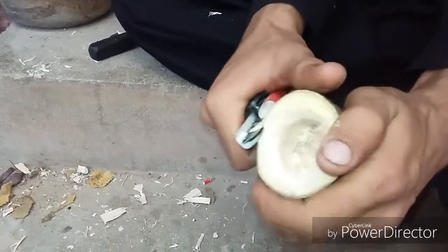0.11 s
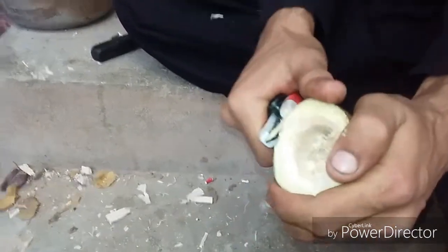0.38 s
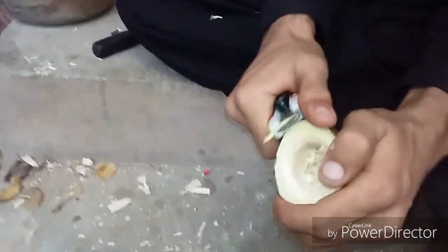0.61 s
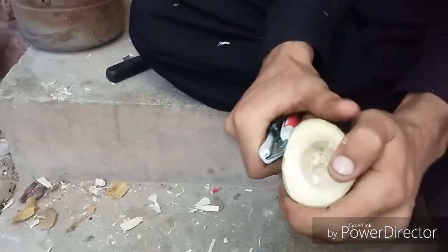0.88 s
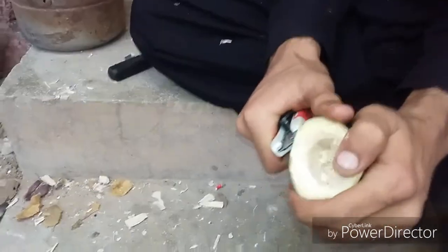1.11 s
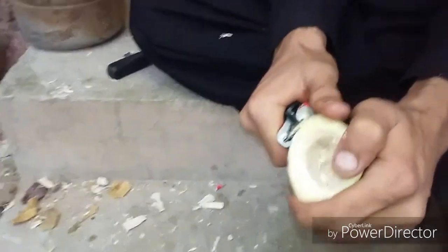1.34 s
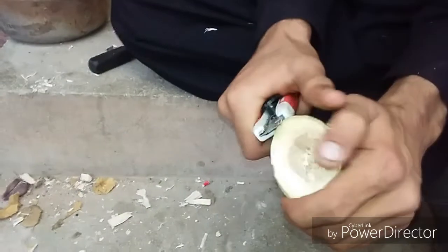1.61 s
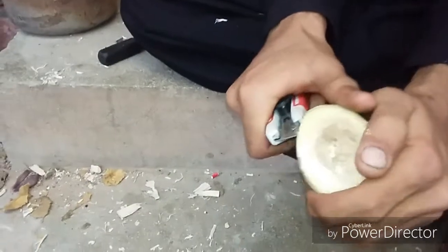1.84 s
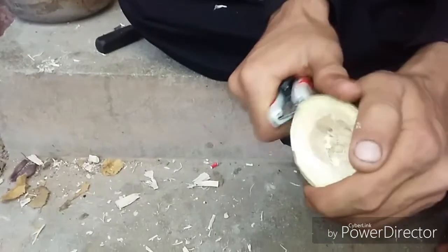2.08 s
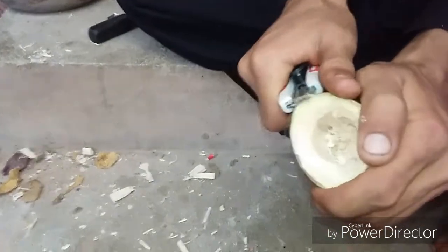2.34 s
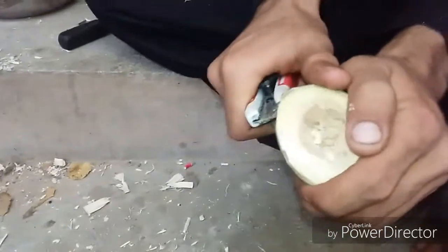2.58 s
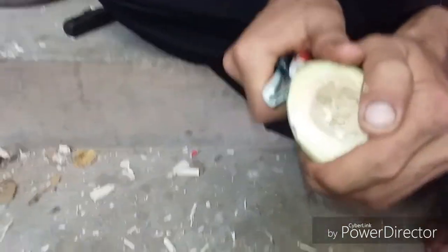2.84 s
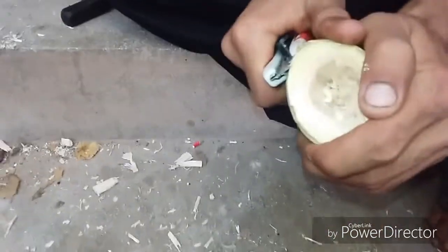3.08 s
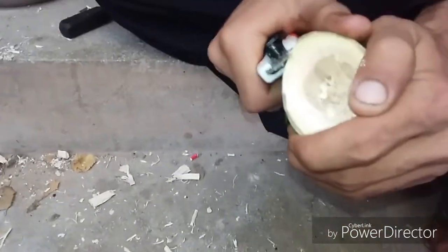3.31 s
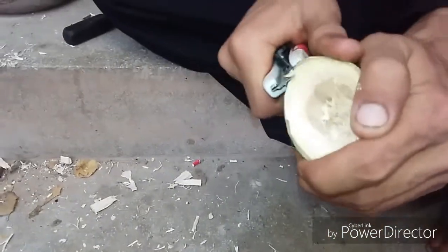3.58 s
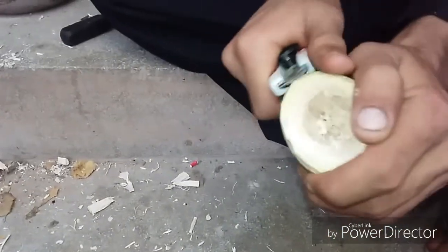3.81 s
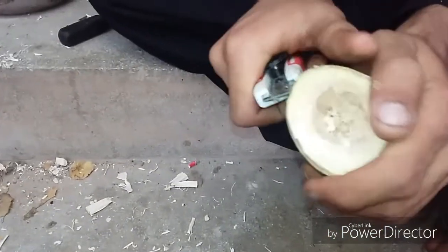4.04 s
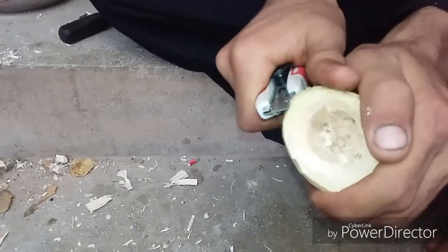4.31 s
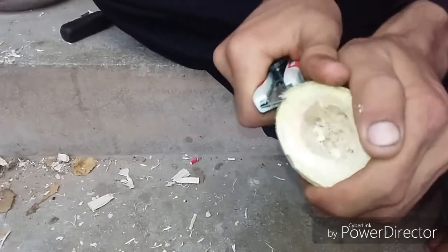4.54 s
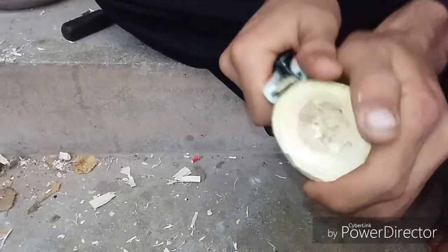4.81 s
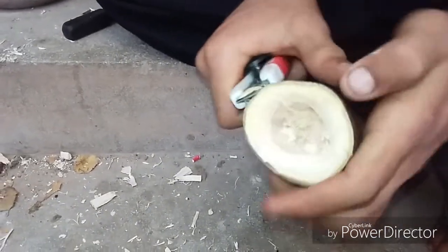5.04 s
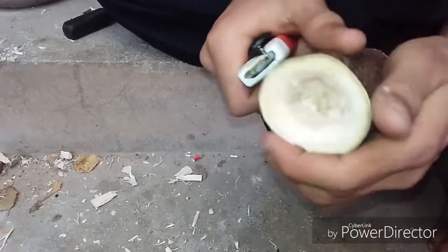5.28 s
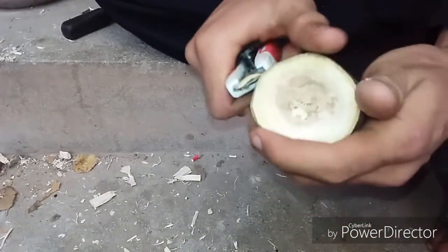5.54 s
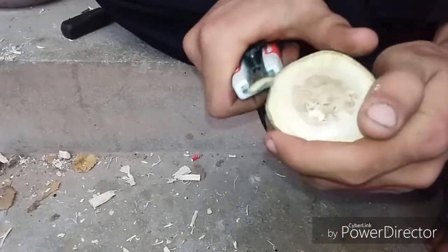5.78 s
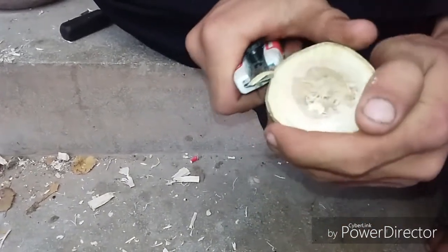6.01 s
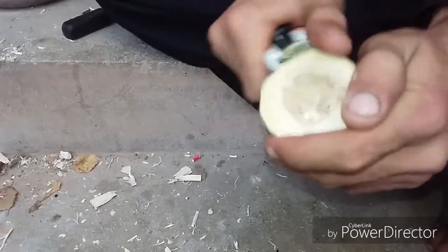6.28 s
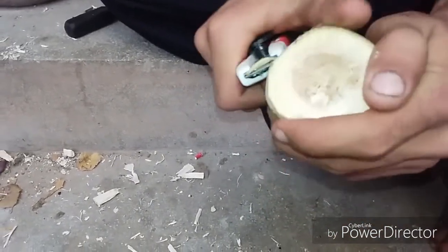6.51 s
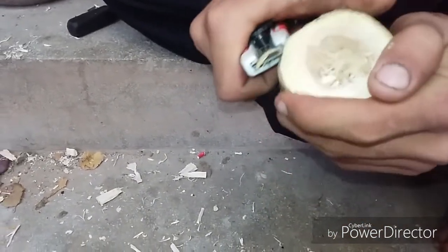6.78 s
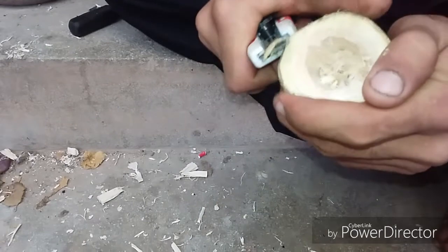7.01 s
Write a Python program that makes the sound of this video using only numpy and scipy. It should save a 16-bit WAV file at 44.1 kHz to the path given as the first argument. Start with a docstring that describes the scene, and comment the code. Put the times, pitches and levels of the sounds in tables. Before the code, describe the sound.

A small knife pares a hand-held wooden round, close and dry, outdoors. Quiet rumble, rustle, slight hiss and a faint high insect trill run throughout. From 0.3 s a rub and dull knock lead into crackling scrapes, strongest at 0.65. After a pause with faint low hums near 1 s, another gritty cluster at 1.4-1.6 ends in a low thump. Light, quick ticks run 2.2-2.6. A sharp snap comes at 3.03, then thin far bird whistles around 3.3-3.6. Strong scrapes and knocks hit at 3.7-3.8. One crisp snap at 4.53 precedes the loudest crack at 4.78, with distant whistle and hoarse calls around it. Small ticks at 5.3 lead to a calm stretch with faint bird calls until 6.2. A dense run of woody scrapes follows at 6.25-6.42, then a soft two-surge swish at 6.7-6.8 fades into the quiet background by 7.1.

```python
"""Paring wood outdoors

A small knife pares the rim of a hand-held round of wood, close to a phone's microphone.
The blade sticks and slips in short bursts: swarms of tiny clicks ring the modes of the wood.
Dull knocks are damped low pushes with a tick; rubs and a late swish are grainy friction.
Further off, noise bands make trilling insects and low traffic rumble, with a rustle over them;
gliding tones make a far bird's whistles, hoarse calls and faint hums."""
import sys
import numpy as np
from scipy import signal
from scipy.fft import rfft, irfft
from scipy.io import wavfile
from scipy.ndimage import uniform_filter1d

SR = 44100
rng = np.random.default_rng(int(sys.argv[2]) if len(sys.argv) > 2 else 0)


def how_loud(loudness_db):
    """Turn decibels into a plain amplitude multiplier (0 dB gives 1, 20 dB gives 10)."""
    steps = np.asarray(loudness_db, float) / 20
    return 10 ** steps


def dump(signal):
    """Clip the signal to [-1, 1] and save it as 16-bit WAV at the path in sys.argv[1]."""
    limited = np.clip(np.atleast_2d(signal).T, -1, 1)
    pcm = np.round(limited * 32767).astype(np.int16)
    wavfile.write(sys.argv[1], SR, pcm)


N = 314433
T = np.arange(N) / SR


def evened(x):
    """Scales to rms 1."""
    return x / np.sqrt(np.mean(x ** 2) + 1e-20)


def add(mix, s, sound):
    """Mixes a sound in from second s."""
    part = mix[round(s * SR):][:len(sound)]
    part += sound[:len(part)]


def track(sounds):
    """Lays (start in s, sound) pairs on a silent track."""
    out = np.zeros(N)
    for s, sound in sounds:
        add(out, s, sound)
    return out


def resonate(x, hz, width):
    """Shifts the curve hz down to zero, smooths, and shifts back: a resonance of gain 1."""
    turn = np.exp(2j * np.pi * np.cumsum(hz * np.ones(len(x))) / SR)
    r = np.exp(-np.pi * width / SR)
    return 2 * (turn * signal.lfilter([1 - r], [1, -r], x / turn)).real


def colour(x, points):
    """Filters by a spectrum, keeping the power of white input."""
    f, db = np.transpose(points)
    bins = np.fft.rfftfreq(len(x), 1 / SR)
    gain = how_loud(np.interp(np.log(bins + 1), np.log(f), db))
    return irfft(rfft(x) * evened(gain), len(x))


def crackle(count, per_s, spread_db):
    """Dense clicks of random sign and uneven size, scaled to rms 1."""
    hit = rng.random(count) < per_s / SR
    size = rng.exponential(size=count)
    sign = rng.standard_normal(count)
    return evened(hit * how_loud(spread_db * np.minimum(size, 4)) * sign)


def drift(per_s):
    """Slow random wander of rms 1."""
    return evened(resonate(resonate(rng.standard_normal(N), 0, per_s), 0, per_s))


def patches(x, patchy_db):
    """Lets the level wander in small blotches of pitch and time."""
    z = signal.stft(x, nperseg=512)[2]
    field = rng.standard_normal(z.shape[::-1]).T
    field = uniform_filter1d(field, size=6, axis=0)
    field = uniform_filter1d(field, size=7, axis=1)
    return evened(signal.istft(z * how_loud(patchy_db * evened(field)), nperseg=512)[1][:N])


# rustle of hands and cloth: (t/s, level/dB)
RUSTLE_LEVEL = [(0.0, -66), (0.55, -61.5), (0.97, -67), (2.24, -68), (2.44, -64.5), (3.16, -63.5),
                (3.61, -70), (3.77, -56), (3.89, -63.5), (4.05, -67.5), (4.57, -64.5), (4.75, -69),
                (4.94, -68), (5.26, -65.5), (6.05, -69), (6.25, -66.5), (6.45, -67.5), (7.13, -63.5)]
# spectrum of the low rumble: (f/Hz, relative density/dB)
RUMBLE_SPECTRUM = [(18, -38), (30, -14.5), (65, 0.5), (199, -5), (279, -15), (397, -16), (487, -20),
                   (635, -21), (1000, -29.5), (1300, -35.5), (2200, -120)]
# spectrum of the rustle: (f/Hz, relative density/dB)
RUSTLE_SPECTRUM = [(300, -3.5), (800, -1), (1500, -2), (3400, -3.5), (4700, -12.5), (5600, -15),
                   (8100, -28.5), (15700, -19)]
RUMBLE_DB, RUMBLE_SHARE, CALM_DB = -58, 0.53, -66.5  # rumble at calm, dB per dB of rustle, calm rustle


def air():
    """Lumpy low rumble that swells with a wide, faintly grainy rustle."""
    rustle_db = np.interp(T, *np.transpose(RUSTLE_LEVEL))
    rumble_db = RUMBLE_DB + RUMBLE_SHARE * (rustle_db - CALM_DB)
    rumble = colour(rng.standard_normal(N), RUMBLE_SPECTRUM)
    grains = crackle(N, per_s=15000, spread_db=0.5)
    rustle = patches(colour(grains, RUSTLE_SPECTRUM), patchy_db=2.5)
    return rumble * how_loud(rumble_db + 1.11 * drift(36)) + rustle * how_loud(rustle_db + 0.93 * drift(25))


# insect band as heard at the microphone, with sudden level changes:
# (t/s, chorus level/dB, nearest singer level/dB)
INSECT_LEVELS = [(0, -77, -79), (.3, -70, -81.5), (3.86, -71.5, -77), (3.9, -77, -87), (4.26, -79, -78),
                 (4.3, -70.5, -79), (4.8, -69.5, -73), (4.95, -60, -68), (5, -73, -74.5), (6, -72.5, -75.5),
                 (7.13, -72.5, -76)]
# spectrum of the chorus: (f/Hz, relative density/dB)
CHORUS_SPECTRUM = [(5300, -56), (5750, -11), (6200, -5), (6850, 3), (7250, -7), (7550, -12), (7800, -27.5)]
CHIRPS_PER_S, CHIRP_LAG_S = 12, 0.0301


def insects():
    """A blurred noise-band chorus, and one nearer singer that gives two short pulses a chirp."""
    s, *columns = np.transpose(INSECT_LEVELS)
    chorus_db, near_db = (np.interp(T, s, c) for c in columns)
    within = ((T - CHIRP_LAG_S) * CHIRPS_PER_S + .5) % 1 - .5  # share of a chirp period from its middle
    pulses = np.exp(-((abs(within) / CHIRPS_PER_S - .0125) / 0.0055) ** 2)  # s either side of the middle
    chorus = colour(rng.standard_normal(N), CHORUS_SPECTRUM)
    near = pulses * resonate(resonate(rng.standard_normal(N), 7304, 530), 6180, 600)
    return how_loud(chorus_db + 2.37 * drift(43)) * evened(chorus) + how_loud(near_db) * evened(near)


def tone(rows, rasp):
    """A thin tone from afar whose level flutters; rasp (0 to 1) spreads it into a rough band."""
    flutter_db = 1.2
    s, *columns = np.transpose(rows)
    t = np.arange(s[0], s[-1], 1 / SR)
    hz, db = (np.interp(t, s, c) for c in columns)
    narrow, wide = rng.standard_normal((2, len(t)))
    thin = np.sin(2 * np.pi * np.cumsum(hz) / SR)
    thin += 0.3 * evened(resonate(resonate(narrow, hz, 70), hz, 70))
    rough = resonate(resonate(wide, hz, 420), hz, 500)
    mix = np.sqrt(1 - rasp) * evened(thin) + np.sqrt(rasp) * evened(rough)
    level = how_loud(db + flutter_db * drift(29.6)[:len(t)])
    return s[0], level * mix * signal.windows.tukey(len(t), .1)


def glide(s, length, first_hz, last_hz, db):
    """A call as a curve: the pitch slides fast, then slower, while the level sinks by 4 dB."""
    u = np.linspace(0, 1, 30)
    return np.transpose([s + u * length, first_hz + (last_hz - first_hz) * u ** .4, db - 4 * u])


# faint low tones that come and go: (start t/s, length/s, first f/Hz, last f/Hz, starting level/dB)
HUM_CALLS = [(1.01, 0.073, 619.8, 640, -67), (1.11, 0.1, 678, 712, -69), (4.5, .8, 665, 689, -70),
             (5.3, 0.95, 705, 700, -79)]


def hums():
    """Faint low gliding tones, slightly rough."""
    return track(tone(glide(*row), rasp=0.21) for row in HUM_CALLS)


# hoarse far calls: (start t/s, length/s, first f/Hz, last f/Hz, starting level/dB)
SQUAWK_CALLS = [(3.27, 0.066, 3170, 3260, -65.5), (4.81, 0.1595, 2200, 2076, -57.5),
                (4.98, 0.28, 2110, 2122, -71.5), (5.13, 0.054, 3310, 3400, -68),
                (5.6, .12, 3700, 3250, -69), (6.025, .19, 2500, 1960, -62)]


def squawks():
    """Gliding calls, almost all rough noise band."""
    return track(tone(glide(*row), rasp=.98) for row in SQUAWK_CALLS)


# short far whistles: (start t/s, length/s, first f/Hz, last f/Hz, starting level/dB)
SHORT_WHISTLES = [(3.4, .06, 3065, 3100, -73), (3.585, .065, 3420, 3223, -70), (5.45, .07, 3000, 2950, -72)]
# long far whistles, one table each: (t/s, f/Hz, level/dB)
LONG_WHISTLE_CURVES = [
    [(3.322, 1722, -66), (3.345, 1745, -65), (3.38, 1808, -68), (3.5, 1830, -64), (3.58, 1795, -70),
     (3.625, 1835, -61), (3.655, 1830, -73)],
    [(4.555, 2350, -55), (4.625, 2360, -68), (4.67, 2384, -60), (4.71, 2370, -70), (4.745, 2350, -56),
     (4.87, 2320, -59), (4.98, 2340, -72)],
    [(5.725, 2450, -72), (5.79, 2510, -70), (5.84, 2464, -76), (5.87, 2420, -67.5), (5.98, 2480, -71),
     (6.025, 2444, -65), (6.1, 2400, -71), (6.19, 2460, -76)],
]


def whistles():
    """Mostly pure tones: short ones glide, long ones follow drawn curves of pitch and level."""
    curves = [glide(*row) for row in SHORT_WHISTLES] + LONG_WHISTLE_CURVES
    return track(tone(curve, rasp=.2) for curve in curves)


# spectrum of tearing fibres: (f/Hz, relative density/dB)
FIBRE_SPECTRUM = [(5500, -43), (7000, -3.5), (9500, -13.5), (12500, -6.5), (15700, -11)]


def tear(grains):
    """Clicks of breaking fibres, filtered to a bright hiss."""
    return colour(grains, FIBRE_SPECTRUM)


# spectrum of soft contact close to the microphone: (f/Hz, relative density/dB)
SKIN_SPECTRUM = [(500, 9.5), (1200, 6.5), (4500, -1.5), (6000, -6.5), (9000, -24)]


def rub(s, rise_s, fade_s, peak_db, hz, low_db, hiss_db, per_s):
    """Fine friction grain through a broad resonance, with a rumble from the grip."""
    t = np.arange(0, rise_s + fade_s, 1 / SR)
    db = peak_db + np.interp(t, [0, rise_s, rise_s + fade_s], [-11, 0, -20.5])
    grain = crackle(len(t), per_s=per_s, spread_db=0.0)
    skin = resonate(resonate(grain, hz, 1360), hz, 3200)
    skin += 0.55 * resonate(resonate(grain, 3000, 2430), 3000, 2400)
    skin = colour(skin, SKIN_SPECTRUM)
    grip = resonate(resonate(rng.standard_normal(len(t)), 260, 307), 270, 253)
    mix = evened(skin) + how_loud(low_db) * evened(grip) + how_loud(hiss_db) * tear(grain)
    return s, how_loud(db) * mix * signal.windows.tukey(len(t), .1)


# a soft, dull swish in two surges, then fading, close by:
# (start t/s, rise/s, fade/s, skin level at the peak/dB, centre f/Hz)
SWISH_SURGES = [(6.68, 0.026, 0.171, -46.5, 2890), (6.76, .07, 0.11, -49, 2450),
                (6.85, 0.043, 0.33, -60.5, 2650)]


def swishes():
    """Dense friction grain with little grip rumble and very little fibre hiss."""
    return track(rub(*row, low_db=-8, hiss_db=-33, per_s=7000) for row in SWISH_SURGES)


# rubs of skin or blade flat on wood, close by:
# (start t/s, rise/s, fade/s, skin level at the peak/dB, centre f/Hz)
RUB_STROKES = [(0.312, 0.011, 0.12, -52.5, 1720), (0.69, 0.0047, 0.065, -46.5, 3200),
               (1.149, 0.038, .04, -61.5, 2160), (3.794, .006, 0.11, -55.5, 2550),
               (3.875, 0.021, .02, -59.5, 2600), (4.804, 0.0074, 0.059, -49, 2620),
               (4.83, 0.064, 0.198, -55.5, 2090), (6.43, 0.0054, 0.033, -53.5, 3000),
               (6.56, 0.025, 0.038, -59.5, 2130)]


def rubs():
    """Coarser friction grain with a strong grip rumble and some fibre hiss."""
    return track(rub(*row, low_db=-1, hiss_db=-17, per_s=4600) for row in RUB_STROKES)


# dull knocks through the hands, close by:
# (t/s, push peak level/dB, settled f/Hz, length/cycles, tick level against the push/dB)
HAND_KNOCKS = [(0.323, -35.5, 175.7, 1.14, -5), (.666, -30.5, 138.8, 1.025, 4),
               (1.557, -23.5, 150, 0.42, -7), (3.034, -45.5, 136, 2.97, -21), (3.143, -35.5, 127, 0.46, 12),
               (3.777, -34.5, 383, 1.8, -13), (3.7842, -26, 356, 1.44, -18), (3.859, -41, 198, 3.5, -20),
               (4.531, -45, 158, 0.71, -15), (4.783, -41.5, 116.4, 3, -5), (4.845, -44.5, 140.4, 2.6, -8.5),
               (4.905, -41.5, 153, 1.7, -20), (6.378, -43.5, 89, 1.4, -3), (6.417, -40, 90.5, 0.52, 15),
               (6.685, -41.5, 147, 1.06, -15), (6.811, -44, 172, 2.76, -15)]


def knocks():
    """A short low push whose pitch sags as the grip damps it, led by a woody tick."""
    out, t = np.zeros(N), np.arange(SR // 8) / SR
    for s, db, hz, cycles, tick_db in HAND_KNOCKS:
        turns = hz * (t + 0.5 * 0.0014 * (1 - np.exp(-t / 0.00082)))
        push = -np.sin(2 * np.pi * turns) * np.sqrt(turns) * np.exp(-(turns / max(cycles, .5)) ** 2)
        tick = np.sin(2 * np.pi * 1900 * t) * np.exp(-t / 0.00031)
        tick += 0.58 * np.sin(2 * np.pi * 600 * t) * np.exp(-t / 0.00067)
        tick *= 1 - np.exp(-t / .0002)  # a fingertip-soft edge
        add(out, s, how_loud(db) * (push / abs(push).max() + how_loud(tick_db) * tick))
    return out


def yard(x):
    """Echoes of the concrete step and near walls: sparse taps that die by 60 dB in 36 ms."""
    spacing = 22  # samples
    at = np.arange(130, SR // 4, spacing)
    taps = np.zeros(SR // 4 + spacing)
    signs = rng.choice([-1., 1.], len(at))
    taps[at + rng.integers(0, spacing, len(at))] = signs * how_loud(-60 * at / SR / 0.036)
    return signal.fftconvolve(resonate(x, 2000, 5200), taps / np.linalg.norm(taps))[:N]


def ring(x, modes, ref):
    """Rings a set of modes, each louder or softer as the grip shifts; the steady signal ref gives rms 1."""
    grip_db = 2  # how far the fingers damp or free each mode
    steady, held = np.zeros((2, N))
    for k, (hz, width, db) in enumerate(modes):
        sign = (-1) ** k
        steady += sign * how_loud(db) * resonate(ref, hz, width)
        held += sign * resonate(x * how_loud(db + grip_db * drift(15.3)), hz, width)
    return held / np.std(steady)


# blade slips, close by: (start t/s, level/dB, rise/ms, fall/ms, low modes against the high/dB)
BLADE_SLIPS = [(0.419, -34, 9.4, 2, -9.5), (0.45, -39, 13.4, 2.5, -8.5), (0.489, -53, 6.8, 12, -7),
               (0.497, -42.5, 3.2, 11.3, -6), (0.516, -40, 14.8, 1.5, -7), (0.613, -35, 3.3, 28, -11.5),
               (0.65, -32.5, 29.3, 11, -4.5), (0.66, -25, 13.5, 6.4, -14), (1.377, -42, 5.57, 4, -6),
               (1.419, -47, 3.1, 8, -5), (1.4346, -30, 9.4, 4.5, -7.5), (1.474, -36, 8.9, 5.9, -6.5),
               (1.502, -41, 6.3, 9.3, -7.5), (1.524, -42.5, 2.7, 27.5, -2.5), (1.541, -30, 5.8, 8, -7),
               (1.549, -32, 21.8, 9.36, -5), (2.2153, -50.5, 5.9, 6, -2.5), (2.2358, -52.5, 20, 15, -3),
               (2.2616, -34, 3.4, 4.7, -6), (2.289, -49, 8.2, 4.6, -2), (2.3058, -35, 2.9, 9, -8.5),
               (2.347, -47.5, 6.5, 3.5, -7), (2.3934, -53.5, 6.9, 8, -2), (2.4077, -43, 6.7, 5.5, -5),
               (2.431, -42.5, 4.4, 3, -11), (2.453, -44, 8.7, 5.4, -8.5), (2.6073, -44.5, 16, 23, -1.5),
               (2.63, -44, 4.8, 6.5, 5.5), (3.0247, -40, 2.3, 9.2, 4.5), (3.031, -23.5, 4.97, 2.5, -5.5),
               (3.152, -51, 2.3, 3, 3), (3.166, -57, 2.3, 3, -9), (3.181, -54, 2.3, 3, -9),
               (3.222, -56, 3, 4, -8), (3.365, -55.5, 8.9, 10.7, -18), (3.652, -48, 12, 9.9, -6),
               (3.7043, -29, 12.7, 2.5, -4), (3.7562, -26.5, 6.5, 14.7, -3),
               (3.7657, -23, 13.92, 4.9, -4.5), (4.0533, -45.5, 3.5, 7.9, -1),
               (4.1421, -55, 1.9, 11, -15.5), (4.31, -46.5, 3.8, 4, 3.5), (4.526, -20, 5.26, 4, -6),
               (4.7721, -23, 13.9, 1.5, -9), (4.7853, -17, 5.8, 6.7, -9), (5.2636, -49.5, 3.9, 13, -7),
               (5.2826, -56, 2.4, 7, -11.5), (5.298, -49.5, 6.2, 3.5, -9), (6.178, -57, 3, 4, -9),
               (6.208, -54, 3, 4, -2), (6.233, -52.5, 3, 4, 1), (6.2506, -39, 4.7, 4.8, -5.5),
               (6.274, -48, 3.0, 2.8, 1), (6.315, -49.5, 4, 9.8, 2), (6.33, -28.5, 3.8, 7.1, -9.5),
               (6.35, -45.5, 9.6, 6.5, -1), (6.368, -28, 21.4, 10.6, -8), (6.3978, -26.5, 8.96, 11.8, -7),
               (6.419, -39.5, 2.4, 11.2, 0), (6.494, -56, 2.9, 1.1, -10)]
# what the wood and blade ring with: (f/Hz, width/Hz, relative level/dB)
WOOD_MODES = [(427, 398, -12.5), (800, 160, -11), (1080, 240, -6.5), (1372, 142, 0.5), (1574, 158, 2),
              (2130, 148, 6), (2420, 203, -2), (2680, 290, -3), (3128, 197, 1), (3580, 244, -0.5),
              (4194, 380, -8.5), (4720, 196, -8), (5110, 390, -15.5), (6320, 390, -15)]
LOW_BELOW_HZ = 2300  # the low modes lie under this
TEAR_DB, TEAR_PER_LOW = -23.5, -0.291  # fibre hiss under the slip; duller slips tear less (dB per dB)
DRAG_DB, DRAG_MS = -24.5, 20.7  # the blade drags on after
# the blade creeps in before it breaks loose, only a little louder for strong slips (dB per dB)
CREEP_DB, CREEP_SHARE, CREEP_MS = -42, 0.46, 9.5


def blade():
    """Each slip is a swarm of tiny breaks that creeps in, breaks loose, swells and dies, ringing the wood."""
    high, low, hiss = np.zeros((3, N))  # power curves
    lead_s = .05
    t_ms = (np.arange(SR // 5) / SR - lead_s) * 1000
    onset = 1 - np.exp(-(np.maximum(t_ms, 0) / 3.3) ** 2)  # the blade breaks loose in a few ms
    for s, db, rise_ms, fall_ms, low_db in BLADE_SLIPS:
        swell = np.clip(1 - t_ms / max(rise_ms, 1), 0, 1)
        past_ms = np.maximum(t_ms - rise_ms, 0)
        decay_db = 11.1 * (past_ms / max(fall_ms, 1)) ** 1.158
        force = (how_loud(db - 4.5 * swell - decay_db) * onset) ** 2
        force += how_loud(2 * (db + DRAG_DB)) * np.exp(-2 * past_ms / DRAG_MS) * (past_ms > 0)
        creep = how_loud(2 * (CREEP_DB + CREEP_SHARE * db)) * np.exp(2 * np.minimum(t_ms, 0) / CREEP_MS)
        creep *= past_ms == 0
        add(high, s - lead_s, force + creep)
        add(low, s - lead_s, (force + creep) * how_loud(2 * low_db))
        add(hiss, s - lead_s, force * how_loud(2 * (TEAR_DB + TEAR_PER_LOW * low_db)))
    breaks = crackle(N, per_s=5000, spread_db=2)
    wood = ring(breaks * np.sqrt(high), [m for m in WOOD_MODES if m[0] > LOW_BELOW_HZ], breaks)
    wood += ring(breaks * np.sqrt(low), [m for m in WOOD_MODES if m[0] < LOW_BELOW_HZ], breaks)
    wood = signal.sosfilt(signal.butter(2, 6000, fs=SR, output="sos"), wood)  # wood swallows the top
    fibres = tear(crackle(N, per_s=15000, spread_db=-1.5) * np.sqrt(hiss))
    return how_loud(-1.5) * wood + fibres


def scene():
    """Knife and hands near, with faint echoes of the cut; the rest far."""
    far = air() + insects() + hums() + squawks() + whistles()
    near = swishes() + rubs() + knocks()
    cut = blade()
    return (far + near + how_loud(-23) * yard(cut) + cut)[None]


# steady hiss: (f/Hz, relative density/dB)
HISS_SPECTRUM = [(300, 12), (6000, 6.5), (8500, -1.5), (11000, -0.5), (15700, 3.5)]


def pick_up(dry):
    """Adds steady microphone hiss at -75 dB and drops the bass below 52 Hz."""
    heard = dry + how_loud(-75) * colour(rng.standard_normal(N), HISS_SPECTRUM)
    return signal.sosfilt(signal.butter(4, 52, "high", fs=SR, output="sos"), heard)


def band_limit(x):
    """A steep low-pass at the top of the band."""
    return signal.sosfilt(signal.butter(12, 15790, fs=SR, output="sos"), x)


def record(dry):
    """The scene as picked up by the close microphone."""
    mix = pick_up(dry)
    return band_limit(mix)


dry = scene()
out = record(dry)
dump(out)
```